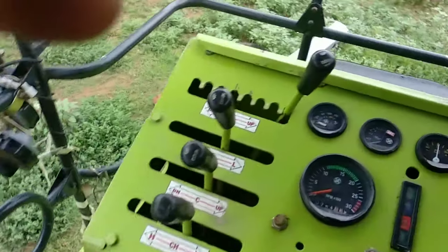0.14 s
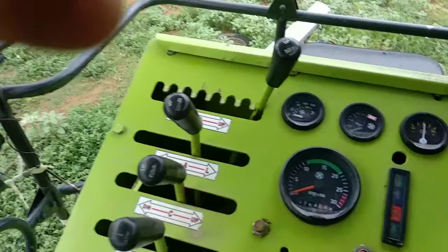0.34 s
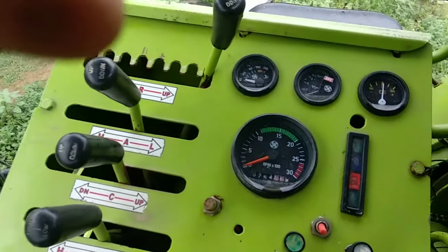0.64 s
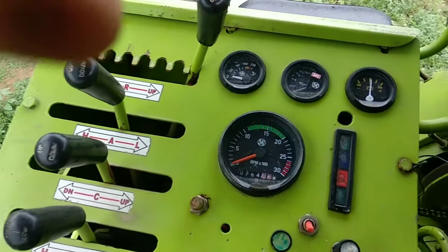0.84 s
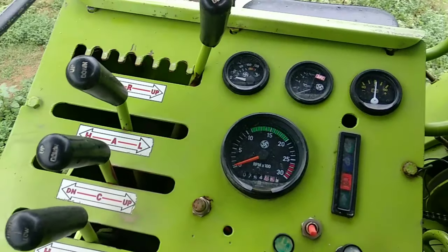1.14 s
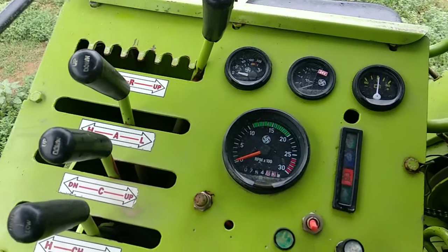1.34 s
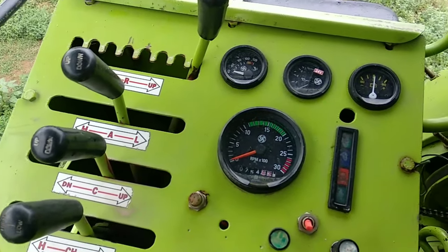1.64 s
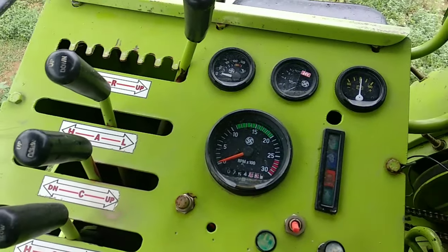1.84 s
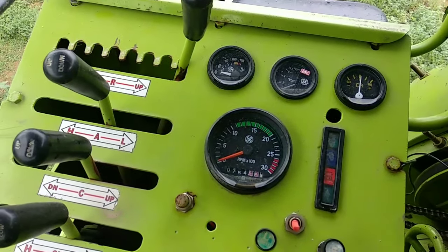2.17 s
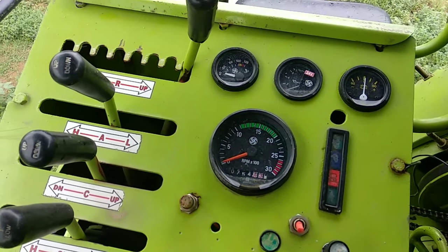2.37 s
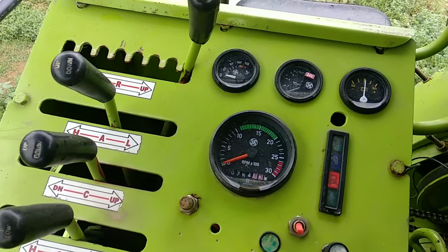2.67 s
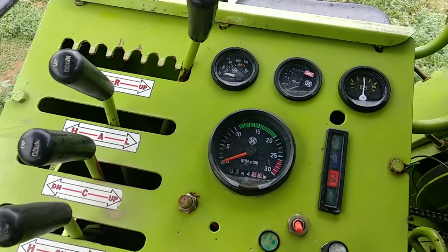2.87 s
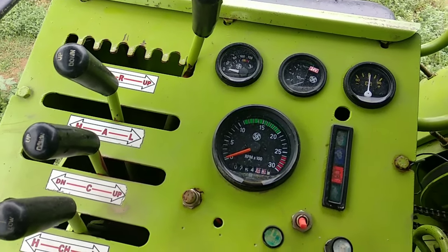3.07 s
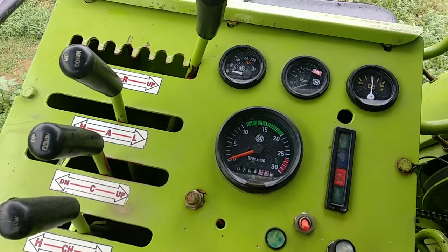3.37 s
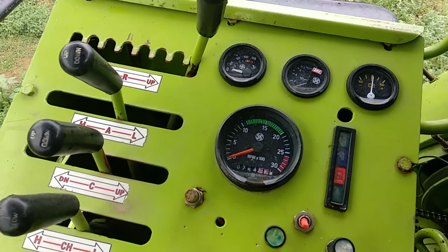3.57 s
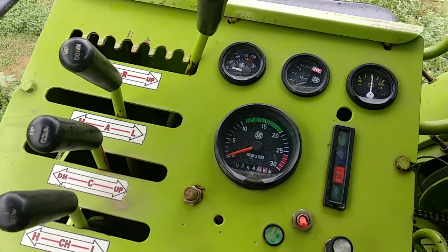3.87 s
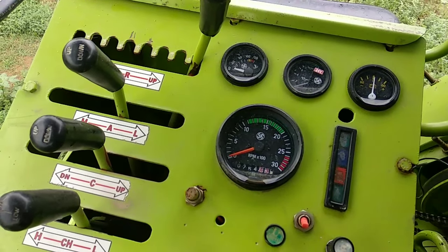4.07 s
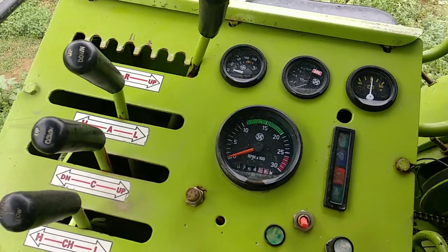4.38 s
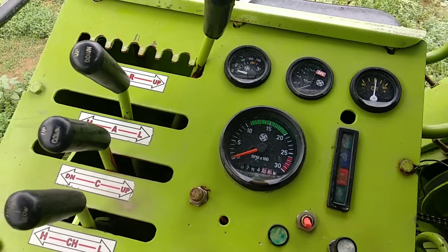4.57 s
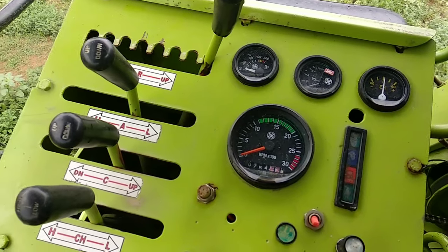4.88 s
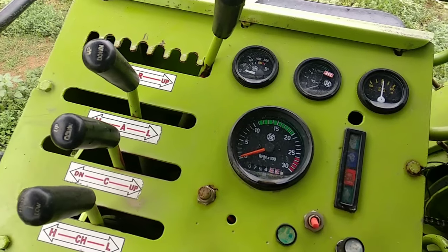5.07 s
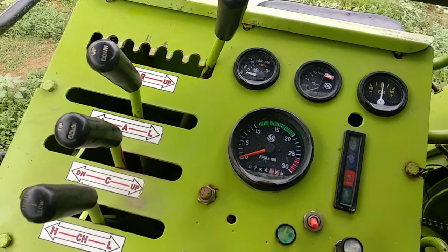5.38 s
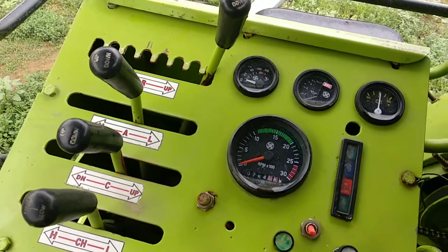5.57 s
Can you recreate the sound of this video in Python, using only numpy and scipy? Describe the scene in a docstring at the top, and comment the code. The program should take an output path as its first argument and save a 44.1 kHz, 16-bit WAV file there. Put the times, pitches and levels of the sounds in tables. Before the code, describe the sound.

Quiet open field with birds and insects, two hard metallic lever knocks, a small key click, then a starter noisily cranks a diesel engine.

```python
"""A starter engages and cranks the diesel of a parked harvester, heard from the cab in a field: knocks
and noise shake frame, panels and loose parts. Before it a lever knocks twice on the steel console and
a key clicks: noise cracks with decaying modes. Outside, birds and a dove (sines and throbbing noise)
and insects (a shrill noise band) sit over a low drone of coloured noise. The microphones are those of
a hand-held phone, the left open, the right under a finger."""
import sys
import numpy as np
from scipy import signal
from scipy.fft import rfft, irfft
from scipy.io import wavfile
from scipy.ndimage import uniform_filter1d

SR = 44100
rng = np.random.default_rng(int(sys.argv[2]) if len(sys.argv) > 2 else 0)


def unload_audio(sound):
    """Save the sound as a 16-bit wav file, at the path given as the first command line argument."""
    columns = np.transpose(np.atleast_2d(sound))
    # keep every value between -1 and 1, then stretch to whole-number steps
    steps = np.round(np.clip(columns, -1, 1) * 32767)
    wavfile.write(sys.argv[1], SR, steps.astype(np.int16))


N = 252252

# Source levels are those ahead of the microphone gain. Spectrum levels give the shape only.
# Widths are those of one resonator; rings() runs two in a row.

# Drone and hiss of the open field. Each row: frequency in Hz, level in dB per Hz.
FIELD_SPECTRUM = [(15, -77), (25, -38), (48, -48), (63, -7.5), (84, 5), (123, -11.5), (212, -16),
                  (384, -22.5), (545, -15.5), (695, -18), (2350, -26), (6050, -27), (7710, -43),
                  (9070, -29), (16000, -46)]
FIELD_DB = -59.5
# Swell of the far drone. Each row: time in seconds, level in dB.
DRONE_SWELL = [(0.0, -65), (0.142, -64.5), (0.466, -61.5), (0.688, -67), (0.886, -69), (1.25, -66)]
# Level of the insect chorus. Each row: time in seconds, level in dB.
INSECT_LEVELS = [(0.0, -68), (1.04, -68), (1.52, -63.5), (2.02, -68.5), (2.34, -65), (2.58, -67.5),
                 (3.8, -66.5), (4.1, -63.5)]
INSECT_HZ, INSECT_WIDTH_HZ = 7710, 810

# Dove coos. Each row: start in seconds, length in seconds, start pitch in Hz, end pitch in Hz,
# arch of the pitch in Hz, level in dB.
COOS = [(1.4, 0.345, 563, 520, 34, -66.5), (2.73, 0.09, 564, 564, 0, -64.5),
        (3.02, 0.38, 562, 556, -0.5, -67), (2.97, 0.79, 511, 511, 0.5, -73),
        (3.76, 0.17, 670, 594, -1.5, -69)]
COO_EDGE_SHARE = 0.14  # share of the coo spent fading in and out
# Falling bird chips. Each row: start in seconds, level in dB, start pitch in Hz, end pitch in Hz,
# length in seconds.
CHIPS = [(0.018, -59, 7000, 5140, 0.018), (0.327, -67.5, 7100, 5030, 0.047), (0.421, -62, 7560, 5360, 0.03),
         (0.648, -66, 7050, 5370, .025), (0.718, -64.5, 4900, 3130, 0.04), (1.266, -67, 5800, 4930, .02),
         (1.298, -65, 7000, 5500, .025), (1.347, -67, 4700, 3400, .04), (1.337, -66, 1540, 1450, .03),
         (1.405, -64.5, 1266, 1100, 0.035), (1.483, -60, 3440, 3090, 0.02),
         (2.786, -63.5, 4500, 3180, 0.05)]
# Harsh calls of another bird. Each row: start in seconds, level in dB, length in seconds.
RASPS = [(0.362, -65.5, 0.21), (0.872, -59, 0.097), (1.041, -58.5, 0.053), (1.122, -63, 0.09)]
# Resonances of the harsh voice. Each row: frequency in Hz, width in Hz, level in dB.
RASP_RESONANCES = [(2860, 280, 4), (3400, 400, -1.5), (4600, 360, -10), (3900, 1100, 0.5)]

# The lever rubs, knocks and rattles on the console. Each row: start in seconds, level in dB, rise in
# seconds, crack t60 in seconds, tail in dB, brightness in dB per octave, ring in dB, freedom to ring
# as a factor on the mode t60, dull knock in dB, extra level of the first mode in dB.
LEVER_BLOWS = [(1.36, -55.5, 0.045, 0.26, -2, 3.5, -9, 0.27, -30, 22),
               (1.567, -49.5, 0.0014, 0.15, -24, 2.5, -13, 0.42, 4, 18.5),
               (1.589, -42, 0.0031, 0.086, -8, 1.5, -17, 0.46, -10, 12.5),
               (1.638, -14, 0.0054, 0.084, -11.5, 3, -22.5, 1, -3, 0),
               (1.685, -29, 0.047, 0.26, -5.5, 1, -13, 0.96, -20, -2),
               (1.855, -53.5, 0.006, 0.1, 1, 0, -16, 0.84, -5, 7),
               (2.003, -47, 0.0018, 0.019, -4, -1, -12.5, 0.4, 12.5, -5),
               (2.062, -51.5, 0.013, 0.24, -17, -0.5, 1, 0.69, -20, -10),
               (2.088, -19, 0.0022, 0.11, -11.5, 1.5, -9, 0.46, 8.5, -6.5)]
# Noise of the struck console. Each row: frequency in Hz, level in dB per Hz.
CONSOLE_SPECTRUM = [(59, -40), (100, 5.5), (229, 2.5), (415, 1.5), (634, 4), (752, -3), (818, -1.5),
                    (891, 8), (2630, -4.5), (3400, -7.5), (7450, -6), (13200, -15), (16000, -27)]
# Modes of the console. Each row: frequency in Hz, level in dB, t60 in seconds.
CONSOLE_MODES = [(236.6, 5.5, 0.84), (759, -3, 0.49), (880, -15.5, 0.82), (1150, -2.5, 0.23),
                 (1313, -11.5, 0.93), (1450, -17, 0.18), (1684, -5.5, 0.5), (1864, -7, 0.5),
                 (2210, -11, 0.93), (2300, -9, 0.5), (2530, -10, 0.44), (2840, -7, 0.19), (3160, -16, 0.58),
                 (3450, -12, 0.36), (3930, -13, 0.24), (4500, -14, 0.36)]
# Key clicks. Each row: the same columns and units as for the lever blows.
KEY_CLICKS = [(0.0, -36, 0.00083, 0.071, -11, 0, -19.5, 1.14, -33, 0.1),
              (2.8445, -34.5, 0.0027, 0.087, -11.5, 0.013, -18, 0.85, -30, 0.1)]
# Noise of the key. Each row: frequency in Hz, level in dB per Hz.
KEY_SPECTRUM = [(180, -39), (300, -17), (519, -15.5), (1100, -11.5), (1460, -22.5), (2440, -14),
                (3830, -17), (4090, -26), (5080, -9.5), (6300, -16.5), (7080, -8), (14700, -20),
                (16000, -39)]
# Modes of the key. Each row: frequency in Hz, level in dB, t60 in seconds.
KEY_MODES = [(940, -1, 0.17), (1096, -2.5, 0.3), (844, 4, 0.1), (700, -4, 0.1)]
# Decay of sound inside the cab. Each row: frequency in Hz, t60 in seconds.
CAB_DECAY = [(150, 1), (400, 0.69), (1040, 0.41), (2760, 0.41), (7280, 0.12)]
CRACK_BASS_HZ = 1210  # width of the bass taken out of the first crack
SWELL_CYCLES = 3.4  # a mode takes a few cycles to build up
KNOCK_HZ, KNOCK_T60_S = 1470, 0.02  # the dull first contact of metal on metal
DETUNE = 0.012  # each blow lands elsewhere: largest pitch shift of a mode, as a share
REBOUNDS_PER_S, REBOUND_DB = 1200, 1.0  # a blow chatters as it settles; dB spread of the rebounds

# Panels singing in short swells. Each row: middle in seconds, level in dB, pitch in Hz, half length
# in seconds.
PANEL_SINGS = [(4.067, -32, 462, 0.043), (4.07, -30, 607, 0.04), (4.132, -26, 246, 0.071),
               (4.2, -23.5, 139.7, 0.21), (4.239, -21, 218, 0.038), (4.512, -27, 371, 0.12),
               (4.539, -24, 335, 0.039), (4.737, -29.5, 766, 0.052), (4.743, -28, 308, 0.14),
               (4.338, -31, 462, 0.062), (4.626, -33, 458, 0.084), (4.746, -28, 461, 0.071),
               (4.85, -31, 470, 0.13), (4.642, -34.5, 751, 0.032), (4.754, -34.5, 1440, 0.048),
               (4.935, -31.5, 593, 0.024), (5.694, -39, 1446, 0.071), (4.841, -32.5, 759, 0.081),
               (4.954, -22.5, 233, 0.02), (5.055, -26, 582, 0.014), (5.084, -28.5, 590, 0.019),
               (5.176, -23, 239.6, 0.099), (5.2, -26, 139, 0.045), (5.405, -30.5, 749, 0.04),
               (5.498, -31, 759, 0.073), (5.559, -31.5, 141, 0.12)]
FAINT_SINGS, FAINT_SING_DB, FAINT_HALF_S = 8, -29, 0.026  # more at random; dB above the panel's own
# Clanks of loose metal. Each row: start in seconds, level in dB, centre in Hz, t60 in seconds,
# length of the cluster in seconds, surge of rattle in dB.
CLANKS = [(4.212, -33, 2620, 0.06, 0.011, -44.5), (4.34, -29, 2230, 0.071, 0.0059, -35.5),
          (4.45, -40, 3500, 0.17, 0.014, -57), (4.585, -37, 3230, 0.16, 0.048, -36),
          (4.705, -34, 1810, 0.034, 0.052, -29.5), (4.808, -37.5, 2000, 0.13, 0.048, -31),
          (5.027, -30.5, 7460, 0.037, 0.004, -51), (5.03, -35, 2670, 0.081, 0.0075, -55),
          (5.112, -33, 3470, 0.042, 0.016, -42), (5.286, -39, 3070, 0.069, 0.0092, -52),
          (5.43, -33, 2980, 0.07, 0.024, -35), (5.64, -36, 4500, 0.04, 0.0095, -48)]
CLANK_RISE_S, CLANK_WIDTH = 0.01, 0.6  # width as a share of the centre
CLUSTER_GRAINS_PER_S, CLUSTER_DB = 1000, 0.9  # a clank is a cluster of small knocks
CLANK_RING_DB, CLANK_RING_T60_S = 5.5, 0.19
CLANK_REACH_OCT = 0.5  # a clank rings the parts nearest its own pitch

# The cranking engine. Each row: time in seconds, frame shake in dB, panel drumming in dB, shake rate
# in Hz.
CRANK = [(4.059, -24.5, -27.5, 102.2), (4.272, -22, -27.5, 98.84), (4.327, -23.5, -30.5, 92.84),
         (4.374, -30, -25.5, 98.17), (4.456, -25.5, -28, 97.32), (4.596, -33.5, -30.5, 95.94),
         (4.656, -24, -29.5, 103), (4.737, -26, -24.5, 102.1), (4.811, -18.5, -27.5, 97.64),
         (4.938, -23, -29, 96.2), (5.072, -22, -32, 96.43), (5.13, -24, -30.5, 103.2),
         (5.33, -18, -28, 101.1), (5.376, -21, -30, 95.9), (5.474, -22.5, -29, 95.56),
         (5.538, -23, -28, 101.9), (5.626, -21.5, -30, 99.9), (5.72, -27, -26, 109.3)]
ENGAGE_S, ENGAGE_RISE_S, ENGAGE_FROM_DB = 4.015, 0.03, -43  # the shaking swells up from faint
HUM_DB, HUM_AT_SHAKE_DB, HUM_SLOPE = -28, -18, 0.45  # slope in dB of hum per dB of shake
# Shaking frame. Each row: frequency in Hz, level in dB per Hz.
FRAME_SPECTRUM = [(30, -60), (57, -2), (91, 2), (145, 2.5), (198, -7.5), (233, -22), (260, -2),
                  (340, -44.5), (570, -120)]
# Drumming panels. Each row: frequency in Hz, width in Hz, level in dB.
PANEL_RESONANCES = [(234.7, 48, 1), (312, 36, -1), (369.1, 20.4, -4), (407.6, 48, -4), (465.4, 50, -7),
                    (602, 80, -7), (759, 57, -7.5)]
# Gear rattle. Each row: frequency in Hz, level in dB per Hz.
RATTLE_SPECTRUM = [(290, -15), (500, -10), (682, -7.5), (754, -30), (817, -9), (950, -5), (1280, -10),
                   (1430, -10), (1920, -13), (2100, -12), (3680, -15), (4190, -19.5), (5500, -25.5),
                   (7150, -40), (12100, -120)]
# Ringing loose parts. Each row: frequency in Hz, width in Hz, level in dB.
LOOSE_PARTS = [(1440, 49, -19), (2057, 38, -21), (2680, 39, -25), (2950, 60, -24.5), (3266, 100, -28),
               (4130, 30, -19.5), (4630, 60, -25.5)]
# Treble fizz of the gears. Each row: frequency in Hz, level in dB per Hz.
FIZZ_SPECTRUM = [(2240, -12), (3800, -9), (4210, 0.5), (4770, -5.5), (7240, -2.5), (10700, -7),
                 (13500, -16.5), (14400, -13), (15000, -60)]
# A crash as the pinion meshes, then a bed of rattle that grows as the starter speeds up.
MESH_S, MESH_RISE_S, MESH_DB, MESH_T60_S, MESH_FIZZ_T60_S = 4.02, 0.028, -23, 0.19, 0.14
BED_DB, BED_DB_PER_S = -38.5, 2.5
FIZZ_DB, FIZZ_DB_PER_S = -5, 3  # relative to the bed
SURGE_RISE_S, SURGE_T60_S = 0.02, 0.28  # each clank brings a surge of rattle
# Uneven thumps of the block on its mounts. Each row: peak in seconds, level in dB, pitch in Hz.
THUMPS = [(4.064, -9, 115.5), (4.12, -13.5, 105), (4.171, -11.5, 96), (4.19, -18.5, 111),
          (4.211, -14.5, 143), (4.258, -16, 116), (4.288, -14, 109), (4.46, -14, 108.4), (4.65, -13, 127),
          (4.7, -14, 114), (4.782, -15, 99), (4.853, -18, 103), (4.889, -10.5, 102), (4.9, -12.5, 101),
          (5.042, -17, 107), (5.273, -14, 95.6), (5.311, -12, 108), (5.348, -14, 98), (5.465, -12.5, 116),
          (5.523, -11.5, 125), (5.551, -11, 105), (5.646, -15, 117)]
THUMP_RISE_S, THUMP_T60_S = 0.019, 0.06
LULL_LEAD_S, LULL_S, LULL_DB = 0.0071, 0.023, -4  # lead of the lull on the thump's peak
DIP_S, DIP_HALF_S, DIP_DB = 5.02, 0.008, -6.5  # the engine's level dips briefly

# Sound through the finger. Each row: frequency in Hz, level in dB, lag in radians.
THROUGH_FINGER = [(30, -5, 1.2), (64, -7.3, 1.2), (107, -9.2, 1.34), (172, -12.5, 1.68), (279, -21, 2.28),
                  (430, -30, 2.7), (800, -45, 3)]
# Leak past the finger. Each row: frequency in Hz, level in dB.
FINGER_LEAK = [(100, -48), (400, -35), (1000, -25.5), (1450, -29.5), (2100, -23), (3300, -33),
               (4100, -29.5), (5000, -32), (6400, -20.5), (7800, -38), (15000, -45)]
# Ticks at the covered port. Each row: tick in seconds, level in dB, length in seconds of the drop in
# level of the right channel before it.
PORT_TICKS = [(1.505, -43, 0.014), (2.384, -46, 0.048), (2.463, -40, 0.017), (2.537, -45, 0.031),
              (2.805, -48.5, 0.042), (2.985, -43, 0.007), (3.154, -42, 0.014), (3.197, -42, 0.0099),
              (3.351, -42, 0.016), (3.47, -40, 0.0091), (3.565, -44, 0.036), (3.599, -42, 0),
              (3.663, -47, 0.0039), (3.784, -43, 0.013), (3.916, -41, 0)]
FAINT_TICKS, FAINT_TICK_DB, FAINT_TICK_SPAN_S = 7, -50, (1.4, 4.0)  # more of them at random
# Microphone self-noise. Each row: frequency in Hz, level in dB per Hz.
SELF_NOISE_SPECTRUM = [(35, 0), (130, 14), (300, 10.5), (700, 4), (2000, 1), (6000, -2), (15000, -1)]
SELF_NOISE_DB = -64
MIC_GAIN_DB, MIC_BASS_HZ, EDGE_HZ = 6.0, 55, 16000  # bass cut and upper band limit
OVERLOAD = 1.3  # ceiling of the soft overload, full scale = 1


def gain_of(db):
    """dB to gain."""
    return 10 ** (np.asarray(db) / 20)


def evened(x):
    """Scales to rms 1."""
    return x / np.sqrt(np.mean(x ** 2) + 1e-20)


def sine(cycles):
    """A sine of amplitude 1 from its running count of cycles."""
    return np.sin(2 * np.pi * cycles)


def read(points, hz, axis=1):
    """Reads one column of a spectrum table on a log frequency axis."""
    rows = np.transpose(points)
    return np.interp(np.log(hz + 1), np.log(rows[0] + 1), rows[axis])


def add(mix, s, sound):
    """Mixes a sound in at time s."""
    part = mix[round(max(s, 0) * SR):][:len(sound)]
    part += sound[:len(part)]


def coloured(x, points):
    """Filters by a spectrum table, rms 1."""
    gain = gain_of(read(points, np.fft.rfftfreq(len(x), 1 / SR)))
    return evened(irfft(rfft(x) * gain, len(x)))


def resonate(x, hz, width):
    """A fixed one-pole resonance, of gain about 1 at its pitch (2 at 0 Hz)."""
    r = np.exp(-np.pi * width / SR)
    return 2 * signal.lfilter([1 - r], [1, -r * np.exp(2j * np.pi * hz / SR)], x).real


def rings(x, table):
    """Sum of steep resonances, each evened and set to its own level."""
    return sum(gain_of(db) * evened(resonate(resonate(x, hz, width), hz, width))
               for hz, width, db in table)


def drift(n, seconds):
    """Slow random wander of rms 1."""
    size = max(round(seconds * SR), 1)
    return evened(uniform_filter1d(uniform_filter1d(rng.standard_normal(n), size), size))


def patchy(x, depth_db):
    """Random patches of colour, some hundred Hz by some ten ms."""
    z = signal.stft(x, nperseg=256)[2]
    patches = rng.standard_normal(z.shape[::-1])
    patches = uniform_filter1d(uniform_filter1d(patches, 9, axis=0), 6, axis=1).T
    return evened(signal.istft(z * gain_of(depth_db * evened(patches)), nperseg=256)[1][:len(x)])


def burst(t, s, rise_s, db, t60):
    """Gain of a swell up to db, then a decay."""
    rise = np.clip((t - s) / max(rise_s, 1e-3), 0, 1) ** 2
    return rise * gain_of(db - 60 * np.maximum(t - s - rise_s, 0) / max(t60, .01))


def chatter_of(n, per_s, spread_db):
    """Gain of a run of small uneven impacts, each dying in a few ms."""
    hit, size = rng.random((n, 2)).T
    train = (hit < per_s / SR) * gain_of(-spread_db * np.log(size + 0.00075))
    impacts = signal.oaconvolve(train, np.exp(-np.arange(600) / 97.0))[:n]
    return evened(.5 + evened(impacts))


def field():
    """A far drone and hiss whose lower part swells, with a shrill flickering band of insects."""
    t = np.arange(N) / SR
    air = coloured(patchy(rng.standard_normal(N), depth_db=2.75), FIELD_SPECTRUM) * gain_of(FIELD_DB)
    swell_gain = gain_of(np.interp(t, *np.transpose(DRONE_SWELL)))
    swell = evened(rings(air, [(301, 406, 0)])) * swell_gain
    flicker = gain_of(0.55 * drift(N, 0.0033) + 2.4 * drift(N, 0.017))
    chorus = evened(rings(rng.standard_normal(N) * flicker, [(INSECT_HZ, INSECT_WIDTH_HZ, 0)]))
    return air + swell + gain_of(np.interp(t, *np.transpose(INSECT_LEVELS))) * chorus


def birds():
    """Coos are wavering sines, chips gliding sines; rasps are noise throbbing in a few resonances."""
    out = np.zeros(N)
    for s, length, start_hz, end_hz, arch_hz, db in COOS:
        n = round(length * SR)
        hz = np.linspace(start_hz, end_hz, n) + arch_hz * signal.windows.tukey(n, .5)
        tone = sine(np.cumsum(hz * (1 + 0.0076 * drift(n, 0.011))) / SR)
        add(out, s, np.sqrt(2) * gain_of(db) * tone * signal.windows.tukey(n, COO_EDGE_SHARE))
    for s, db, start_hz, end_hz, length in CHIPS:
        hz = np.linspace(start_hz, end_hz, round(length * SR))
        tone = sine(np.cumsum(hz) / SR)
        add(out, s, np.sqrt(2) * gain_of(db) * tone * signal.windows.tukey(len(hz), .5))
    for s, db, length in RASPS:
        n = round(length * SR)
        throb = gain_of(4.7 * drift(n, 0.00086))
        voice = evened(rings(rng.standard_normal(n) * throb, RASP_RESONANCES))
        add(out, s, gain_of(db) * voice * signal.windows.tukey(n, .4))
    return out


def far_birds():
    """The far birds, part direct and part smeared by echoes that decay as noise."""
    calls = birds()
    echoes = rng.standard_normal(4000) * gain_of(-60 * np.arange(4000) / SR / 0.2)
    smeared = signal.oaconvolve(calls, echoes / np.linalg.norm(echoes))[:N]
    return 0.64 * calls + 0.86 * smeared


def cab_tail(noise, spectrum, struck):
    """Chattering noise dies band by band in the cab and keeps feeding the struck modes."""
    n = len(noise)
    rebounds = coloured(noise * chatter_of(n, REBOUNDS_PER_S, REBOUND_DB), spectrum)
    hz, frame_s, z = signal.stft(rebounds, SR, nperseg=256)
    decay = gain_of(-60 * frame_s / read(CAB_DECAY, hz)[:, None])
    tail = signal.istft(z * decay, SR, nperseg=256)[1][:n]
    return 0.83 * tail + 1.6 * sum(gain_of(db) * resonate(tail, hz, 35) for hz, db, _ in struck)


def mode_ring(t, struck, tilt_db, free):
    """Decaying sines that build up over a few cycles; loose contact makes each flutter."""
    ring = np.zeros(len(t))
    for (hz, db, t60), phase in zip(struck, rng.random(len(struck))):
        flutter_db = 3.5 * drift(len(t), .008)
        gain = gain_of(db + tilt_db * np.log2(hz / 1500) - 60 * t / (t60 * free) + flutter_db)
        ring += gain * (1 - np.exp(-hz * t / SWELL_CYCLES)) * sine(hz * t + phase)
    return ring


def hits(table, spectrum, modes):
    """Each contact of metal is a noisy crack, a dull knock, the modes it rings and a tail in the cab."""
    out, t = np.zeros(N), np.arange(20000) / SR
    for s, db, rise, t60, tail_db, tilt_db, ring_db, free, knock_db, first_db in table:
        tilted = [(hz, level + tilt_db * np.log2(hz / 1500)) for hz, level in spectrum]
        shifts = 1 + DETUNE * rng.uniform(-1, 1, len(modes))
        struck = [(hz * shift, level + first_db * (k == 0), decay)
                  for k, ((hz, level, decay), shift) in enumerate(zip(modes, shifts))]
        crack = coloured(rng.standard_normal(len(t)), tilted)
        crack = crack - .5 * resonate(crack, 0, CRACK_BASS_HZ)
        crack = crack * gain_of(-60 * t / max(t60, .01))
        tail = gain_of(tail_db) * cab_tail(rng.standard_normal(len(t)), tilted, struck)
        ring = gain_of(ring_db) * mode_ring(t, struck, tilt_db, free)
        knock = gain_of(knock_db - 60 * t / KNOCK_T60_S) * sine(KNOCK_HZ * t)
        attack = np.minimum(t / max(rise, 1e-4), 1) ** 2
        add(out, s, gain_of(db) * attack * (crack + tail + ring + knock))
    return out


def singing_panels():
    """Panels sing as sines in short swells, some listed and some at random panel pitches."""
    out = np.zeros(N)
    when, which, size = rng.random((FAINT_SINGS, 3)).T
    chosen = (which * len(PANEL_RESONANCES)).astype(int)
    panel_hz, _, panel_db = np.transpose(PANEL_RESONANCES)[:, chosen]
    faint_s = ENGAGE_S + .1 + when * (N / SR - ENGAGE_S)
    faint = np.transpose([faint_s, FAINT_SING_DB + panel_db, panel_hz, FAINT_HALF_S * (.5 + size)])
    for s, db, hz, half in [*PANEL_SINGS, *faint]:
        t = np.arange(-half, half, 1 / SR)
        swell = np.sqrt(2) * gain_of(db) * np.hanning(len(t)) ** 2
        add(out, s - half, swell * sine(hz * t + rng.random()))
    return out


def clanks():
    """Loose metal clanks as puffs of noise in one band, which ring the loose parts of nearby pitch."""
    out, t = np.zeros(N), np.arange(8000) / SR
    ring_width_hz = np.log(1000) / np.pi / CLANK_RING_T60_S
    for s, db, hz, t60, hold, _ in CLANKS:
        puff = rng.standard_normal(len(t))
        cluster = puff * chatter_of(len(t), CLUSTER_GRAINS_PER_S, CLUSTER_DB)
        band = evened(rings(cluster, [(hz, CLANK_WIDTH * hz, 0), (hz, 3.3 * hz, -3)]))
        struck = puff * gain_of(-60 * np.maximum(t - hold, 0) / max(t60, .01))
        struck = struck * np.sqrt(SR * CLANK_RING_T60_S / 2)  # makes up for the narrow resonance
        ring = np.zeros(len(t))
        for part_hz, _, level in LOOSE_PARTS:
            miss = np.log2(part_hz / hz) / CLANK_REACH_OCT
            ring += gain_of(level - 6.5 * miss ** 2) * resonate(struck, part_hz, ring_width_hz)
        add(out, s + CLANK_RISE_S / 2, gain_of(db + CLANK_RING_DB) * ring)
        decay = gain_of(db - 60 * np.maximum(t - CLANK_RISE_S - hold, 0) / max(t60, .01))
        add(out, s, decay * np.minimum(t / CLANK_RISE_S, 1) * band)
    return out


def thumps(t):
    """Short low swings of the block, and the lull in the shaking around the start of each."""
    swing, lull = np.zeros(len(t)), np.ones(len(t))
    for s, db, hz in THUMPS:
        gain = burst(t, s - THUMP_RISE_S, THUMP_RISE_S, db, THUMP_T60_S)
        swing += gain * sine(hz * (t - s) + rng.random())
        lull *= gain_of(LULL_DB * np.exp(-((t - s + LULL_LEAD_S) / LULL_S) ** 2))
    return swing, lull


def gear_noise(t):
    """Meshing teeth rattle and fizz: a crash, then a growing bed with a surge at each clank."""
    since = t - ENGAGE_S
    bed = burst(t, MESH_S, MESH_RISE_S, BED_DB, np.inf) * gain_of(BED_DB_PER_S * since)
    surges = sum(burst(t, row[0], SURGE_RISE_S, row[-1], SURGE_T60_S) ** 2 for row in CLANKS)
    bed = np.sqrt(bed ** 2 + surges)
    crash = burst(t, MESH_S, MESH_RISE_S, MESH_DB, MESH_T60_S)
    fizz_crash = burst(t, MESH_S, MESH_RISE_S / 2, MESH_DB, MESH_FIZZ_T60_S)
    rattle_gain = np.hypot(bed, crash)
    fizz_gain = np.hypot(bed * gain_of(FIZZ_DB + FIZZ_DB_PER_S * since), fizz_crash)
    chatter = gain_of(.8 * drift(len(t), 0.005))  # teeth meet unevenly
    grind, hiss = rng.standard_normal((2, len(t))) * chatter
    rattle = patchy(coloured(grind, RATTLE_SPECTRUM) + rings(grind, LOOSE_PARTS), depth_db=1.5)
    fizz = patchy(coloured(hiss, FIZZ_SPECTRUM), depth_db=1.0)
    return rattle_gain * rattle + fizz_gain * fizz


def engine():
    """Uneven knocks of the starter pinion on the ring gear shake frame, panels and loose parts."""
    t = np.arange(ENGAGE_S, N / SR, 1 / SR)
    s, *columns = np.transpose(CRANK)
    shake_db, panel_db, hz = (np.interp(t, s, column) for column in columns)
    rise_db = ENGAGE_FROM_DB * np.maximum(1 - (t - ENGAGE_S) / ENGAGE_RISE_S, 0)
    shake_db, panel_db = shake_db + rise_db, panel_db + rise_db
    turns = np.cumsum(hz * (1 + 0.0774 * drift(len(t), 0.00837))) / SR
    clicks = np.diff(np.floor(turns), prepend=0)  # one knock per whole turn
    knocks = evened(clicks * gain_of(3.9 * drift(len(t), 0.0055)))
    frame_noise, panel_noise = rng.standard_normal((2, len(t)))
    frame = coloured(.5 * knocks + 0.68 * frame_noise, FRAME_SPECTRUM)
    panels = evened(rings(0.36 * knocks + panel_noise, PANEL_RESONANCES))
    # a clean low hum, a sine that follows the shake rate
    hum_db = HUM_DB + HUM_SLOPE * (shake_db - HUM_AT_SHAKE_DB)
    hum = np.sqrt(2) * gain_of(hum_db) * sine(np.cumsum(hz) / SR)
    swing, lull = thumps(t)
    roar = lull * (gain_of(shake_db) * frame + hum) + swing
    roar = roar + gain_of(panel_db) * panels + gear_noise(t)
    dip = gain_of(DIP_DB * np.exp(-((t - DIP_S) / DIP_HALF_S) ** 2))
    out = np.zeros(N)
    add(out, ENGAGE_S, roar * dip)
    return out


def scene():
    """Field, birds, lever, key and engine add up in the air and reach both microphone ports alike."""
    sound = field() + far_birds()
    sound += hits(LEVER_BLOWS, CONSOLE_SPECTRUM, CONSOLE_MODES)
    sound += hits(KEY_CLICKS, KEY_SPECTRUM, KEY_MODES)
    sound += singing_panels() + clanks() + engine()
    return np.array([sound, sound])


def covered_port(x, hiss):
    """Late bass through the finger, a faint leak of shifting paths, short drops in level and ticks."""
    hz, _, z = signal.stft(x, SR, nperseg=1024, noverlap=768)
    paths = rng.standard_normal((z.shape[1], len(hz), 2))
    a, b = uniform_filter1d(uniform_filter1d(paths, 9, axis=0), 5, axis=1).T
    leak = gain_of(read(FINGER_LEAK, hz))[:, None] * (evened(a) + 1j * evened(b)) / np.sqrt(2)
    through = gain_of(read(THROUGH_FINGER, hz)) * np.exp(-1j * read(THROUGH_FINGER, hz, axis=2))
    heard = z * (through[:, None] + leak)
    out = signal.istft(heard, SR, nperseg=1024, noverlap=768)[1][:N] + hiss
    t = np.arange(N) / SR
    for s, _, drop_s in PORT_TICKS:
        dropped = 1. * ((t > s - drop_s) & (t < s))
        out = out * (1 - 0.81 * uniform_filter1d(dropped, size=100))
    u = np.arange(800) / SR / 0.0014
    push = -(1 - u) * np.exp(-u) * np.minimum(u / 0.09, 1)  # a sudden push that swings back
    faint = [(s, FAINT_TICK_DB, 0) for s in rng.uniform(*FAINT_TICK_SPAN_S, FAINT_TICKS)]
    for s, db, _ in [*PORT_TICKS, *faint]:
        add(out, s - .001, gain_of(db) * push)
    return out


def record(dry):
    """The phone: bass loss, open left and covered right port, self-noise, soft overload, band limit."""
    noise = rng.standard_normal((2, N))
    hiss = gain_of(SELF_NOISE_DB) * np.array([coloured(v, SELF_NOISE_SPECTRUM) for v in noise])
    bass_cut = signal.butter(3, MIC_BASS_HZ, "high", fs=SR, output="sos")
    left, right = gain_of(MIC_GAIN_DB) * signal.sosfilt(bass_cut, dry)
    ports = np.array([left + hiss[0], covered_port(right, hiss[1])])
    ports = OVERLOAD * np.tanh(ports / OVERLOAD)
    band_limit = signal.firwin(511, EDGE_HZ, window=("kaiser", 9), fs=SR)
    return signal.oaconvolve(ports, band_limit[None], "same")


dry = scene()
out = record(dry)
unload_audio(out)
```